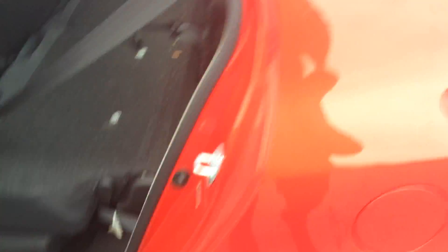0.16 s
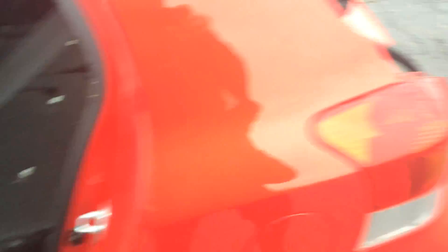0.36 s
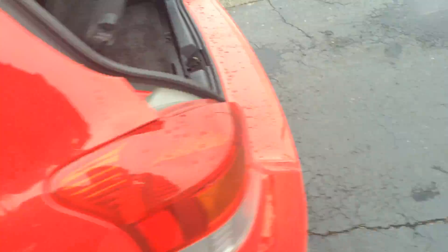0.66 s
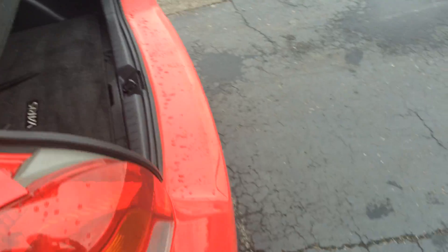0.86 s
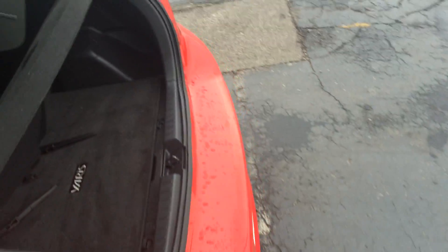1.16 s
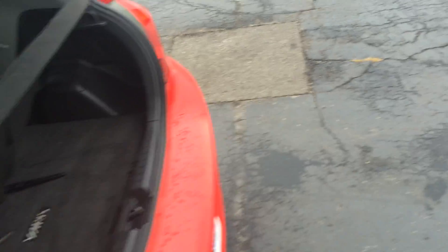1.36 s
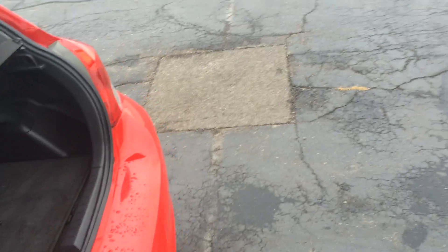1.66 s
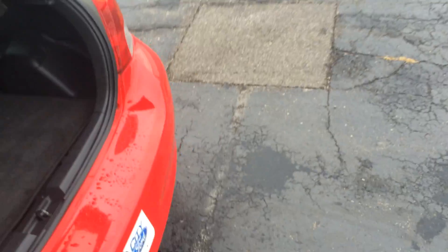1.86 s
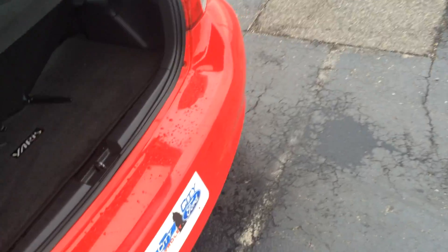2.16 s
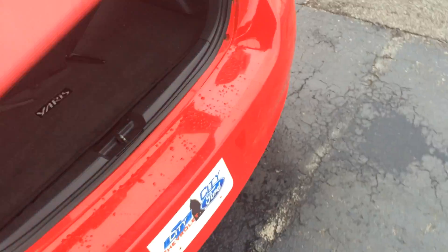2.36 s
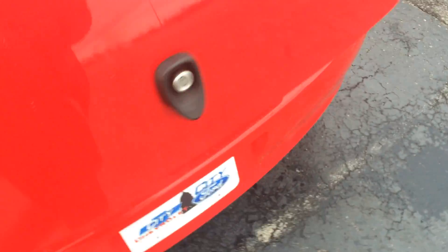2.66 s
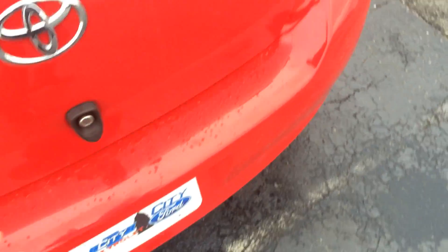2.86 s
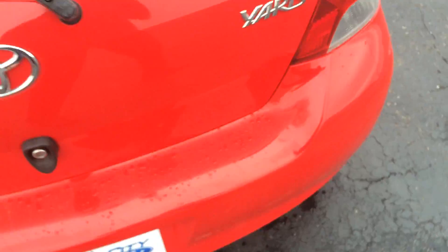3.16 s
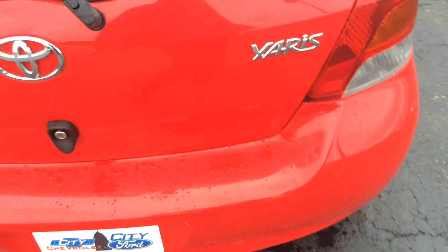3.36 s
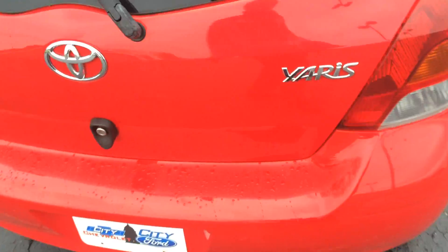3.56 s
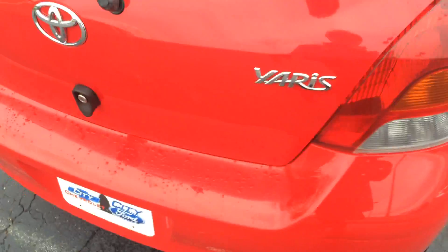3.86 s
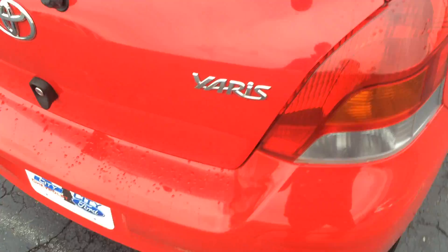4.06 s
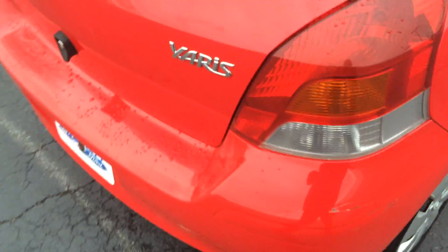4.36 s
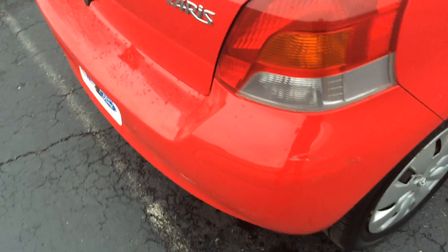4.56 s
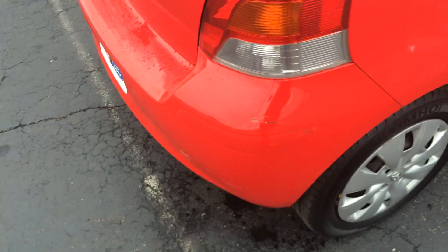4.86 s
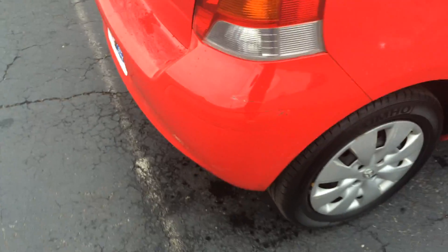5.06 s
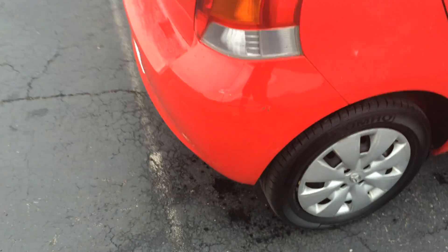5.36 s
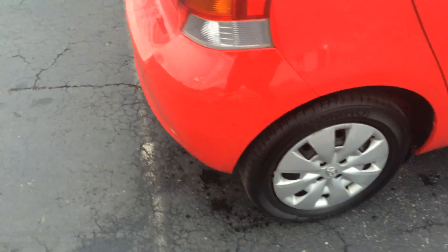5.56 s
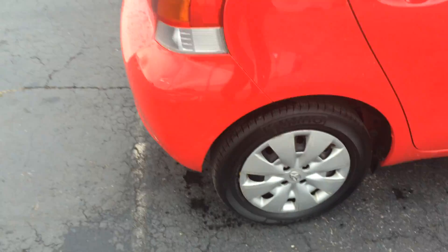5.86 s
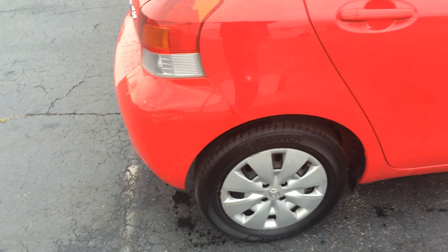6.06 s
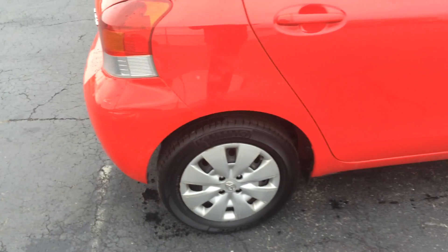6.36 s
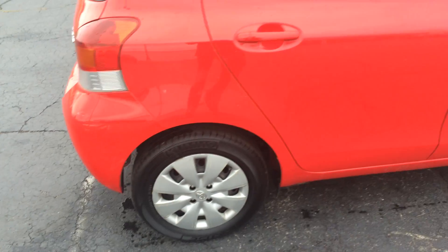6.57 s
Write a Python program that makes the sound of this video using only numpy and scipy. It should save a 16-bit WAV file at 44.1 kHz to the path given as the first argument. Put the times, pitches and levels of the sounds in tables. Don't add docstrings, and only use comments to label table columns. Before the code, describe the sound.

Wind buffets a bare phone microphone over a small car's uneven idle; a side door slams, then the heavier tailgate bangs shut.

```python
import sys
import numpy as np
from scipy import signal
from scipy.fft import rfft, irfft, next_fast_len
from scipy.io import wavfile
from scipy.ndimage import uniform_filter1d

SR = 44100
rng = np.random.default_rng(int(sys.argv[2]) if len(sys.argv) > 2 else 0)


def invert_db(level):
    return 10 ** (np.asarray(level, dtype=float) / 20)


def inscribe(sig):
    pcm = np.round(np.clip(np.atleast_2d(sig).T, -1, 1) * 32767)
    wavfile.write(sys.argv[1], SR, pcm.astype(np.int16))


N = 296793
T = np.arange(N) / SR


def noise():
    return rng.standard_normal(N)


def unit(x):
    return x / np.sqrt(np.mean(x ** 2))


def dull(x, hz):
    return signal.sosfilt(signal.butter(4, hz, fs=SR, output="sos"), x)


def decay(t, t60):
    return np.exp(-np.log(1000) * t / t60)


def curves(table):
    s, *columns = np.transpose(table)
    return [np.interp(T, s, c) for c in columns]


def colour(points):
    hz, db = np.transpose(points)
    size = next_fast_len(N)
    f = np.maximum(np.arange(size // 2 + 1) * SR / size, 1)
    gain = invert_db(np.interp(np.log(f), np.log(hz), db, -90, -90))
    return unit(irfft(rfft(noise(), size) * gain, size)[:N])


def ring(x, peaks):
    power = sum(invert_db(2 * db) * np.pi * width / SR for hz, width, db in peaks)
    out = 0
    for k, (hz, width, db) in enumerate(peaks):
        b, a = signal.iirpeak(hz, hz / width, SR)
        out = out + (-1) ** k * invert_db(db) * signal.lfilter(b, a, x)
    return out / np.sqrt(power)


def walk(rate):
    k = int(SR / rate)
    held = np.repeat(rng.standard_normal(N // k + 1), k)
    return 1.09 * uniform_filter1d(uniform_filter1d(held, k), k)[:N]


def strikes(s, db, t60, rise_s):
    power = np.zeros(N)
    for at, gain, ring_s in zip(s, invert_db(db), np.clip(t60, .005, 1)):
        i = slice(int(at * SR) + 1, int((at + 2 * ring_s) * SR))
        t = T[i] - at
        power[i] += (gain * decay(t, ring_s) * (1 - np.exp(-t / rise_s))) ** 2
    return np.sqrt(power)


def swings(rows, point):
    out = np.zeros(N)
    for (s, db, hz, ms), turn in zip(rows, rng.random(len(rows))):
        i = slice(max(int((s - .06) * SR), 0), int((s + .06) * SR))
        t = T[i] - s
        bell = np.exp(-np.log(2) * np.abs(2000 * t / ms) ** point)
        out[i] += invert_db(db) * bell * np.cos(2 * np.pi * (hz * t + turn))
    return out


def scattered(gap_s, wind_db, db, growth, scatter_db):
    s = np.arange(0, T[-1] - gap_s, gap_s)
    late, size, spare = rng.standard_normal((len(s), 3)).T
    s = s + gap_s * np.minimum(np.abs(late) / 2, 1)
    light_wind_db = -40
    gust_db = growth * (wind_db[(s * SR).astype(int)] - light_wind_db)
    return s, db + gust_db + scatter_db * np.clip(size, -3, 1.5), spare


# start_s, level_db
WIND_LEVEL = [(0, -39), (.44, -33), (.52, -27.5), (.71, -31.5), (.95, -47), (1.25, -44), (2.3, -45.5),
              (4.3, -43.5), (4.42, -32.5), (4.66, -39), (4.76, -25.5), (4.92, -49), (5.1, -45), (5.28, -31),
              (5.5, -43), (6.1, -38), (6.54, -49), (6.73, -45)]
# peak_s, level_db, pitch_hz, length_ms
GUST_POPS = [(.371, -24.5, 135, 2.8), (.401, -13.5, 149, 7.6), (.477, -19.5, 98, 48),
             (.491, -17, 109, 11.4), (.527, -11, 100, 7.9), (.571, -22, 145, 2.5), (.585, -15.5, 138, 6.9),
             (.62, -38, 107, 8.1), (.653, -14, 149, 8.7), (.69, -26, 149, 2.1), (4.415, -21, 126, 11),
             (4.428, -16, 89, 20), (4.443, -11, 105, 9.5), (4.47, -16.5, 171, 5.3),
             (4.498, -13.5, 136, 4.8), (4.59, -21.5, 170, 3.2), (4.629, -17.5, 103.5, 12.4),
             (4.689, -20, 128, 9.2), (4.754, -21, 190, 2.9), (4.767, -15.5, 119, 15),
             (4.791, -12.5, 99, 12.5), (4.807, -12, 110, 5.3), (4.83, -20.5, 105, 38),
             (5.141, -11.5, 95, 5.1), (5.173, -14, 113, 3.9), (5.191, -16.5, 115, 16),
             (5.217, -13.5, 125, 6.9), (5.291, -14.5, 117, 7.4), (5.309, -15.5, 119, 6.6),
             (5.344, -23, 152, 14)]
# peak_s, level_db, length_ms
MORE_PUFFS = [(.014, -24, 6.3), (.056, -30, 9.7), (.095, -23, 16), (.159, -17, 7.8), (.235, -22.5, 8.5),
              (.755, -20.5, 5.1), (.899, -22, 9), (1.114, -25.5, 8.2), (1.271, -27, 5.8), (1.422, -22, 7.9),
              (1.573, -30, 23), (2.31, -24.5, 14), (2.436, -25.5, 4.1), (2.967, -33, 5.4), (3.773, -31, 24),
              (4.392, -29, 5.2), (4.537, -31, 7.2), (4.737, -22, 9), (4.865, -28, 7), (4.884, -20.5, 7.4),
              (5.407, -28, 6.2), (5.567, -17.5, 13.4), (5.591, -20, 5.3), (5.679, -20, 6), (5.712, -22, 13),
              (5.798, -26.5, 7.2), (5.904, -21.5, 7.3), (6.011, -15.5, 14), (6.028, -29, 16),
              (6.178, -23.5, 7.2), (6.409, -21.5, 5.9), (6.453, -27.5, 21), (6.478, -19.5, 3.9),
              (6.492, -22, 8), (.296, -35, 6.7), (.328, -28, 7.6), (.456, -34, 9.1), (1.184, -36, 11),
              (1.231, -30.5, 13), (1.298, -30, 6.3), (1.36, -33.5, 11), (1.712, -28.5, 9.8),
              (1.916, -33.5, 5.6), (2.098, -33, 8.8), (2.342, -34, 14), (2.91, -34, 13),
              (3.544, -27.5, 10.5), (3.616, -33.5, 10), (3.69, -29.5, 12), (4.057, -33.5, 11),
              (4.356, -42, 7.5), (4.923, -32, 14), (5.101, -41, 15), (5.229, -23.5, 10), (5.264, -37, 4.5),
              (5.325, -21, 7.2), (5.451, -33.5, 5.1), (5.507, -43, 16), (5.94, -34, 8.6), (6.081, -29, 6.9),
              (6.144, -28.5, 5), (6.215, -25.5, 7.8)]
# peak_s, level_db, pitch_hz
EDDY_EDGES = [(0.017, -33.5, 420), (0.399, -28.5, 372), (0.479, -23, 365), (0.556, -26.5, 370),
              (.574, -24.5, 390), (.654, -27, 433), (.692, -25, 426), (0.773, -23, 562), (2.078, -31, 343),
              (4.44, -32, 473), (4.489, -22, 350), (4.499, -14.5, 385), (4.517, -28.5, 392),
              (4.594, -28, 385), (4.607, -28, 400), (4.686, -23.5, 358), (4.768, -15, 455),
              (4.783, -15, 340), (4.807, -15, 457), (4.829, -21.5, 362), (4.844, -24, 360),
              (5.141, -21.5, 393), (5.202, -25.5, 340), (5.305, -23, 350), (5.406, -31.5, 526),
              (5.585, -28, 420), (6.223, -30, 530), (6.405, -24, 398), (6.475, -26, 410), (6.496, -26, 337),
              (0.162, -35, 340), (0.37, -29.5, 332), (0.52, -28, 340), (0.539, -27, 334), (.62, -30, 300),
              (0.918, -36, 345), (1.29, -32, 343), (2.486, -31, 330), (3.952, -37, 310), (4.102, -40, 290),
              (4.25, -35.5, 300), (4.453, -25, 327), (4.736, -29, 360), (4.756, -24, 345),
              (5.064, -40, 303), (5.19, -26, 320), (5.219, -28.5, 383), (5.263, -33, 320),
              (5.293, -24.5, 340), (5.349, -28, 315), (5.619, -30, 298), (5.631, -36, 380),
              (5.939, -33, 340), (6.147, -47, 297)]


def wind():
    wind_db = curves(WIND_LEVEL)[0]
    edge_cycles, snap_cycles = 0.8, 1.03
    edges = swings([(s, db, hz, 1000 * edge_cycles / hz) for s, db, hz in EDDY_EDGES], 1.1)
    s, db, pitch = scattered(.009, wind_db, db=-53.5, growth=0.67, scatter_db=1)
    hz = 340 * np.exp(.15 * pitch)
    edges = edges + swings(list(zip(s, db, hz, 1000 * snap_cycles / hz)), 3.1)
    s, db, span = scattered(.024, wind_db, db=-39, growth=0.89, scatter_db=5)
    puffs = MORE_PUFFS + list(zip(s, db, 6.5 * np.exp(0.14 * span)))
    puff_swings = [(s, db, 104.8 * (10 / ms) ** 0.66, ms) for s, db, ms in puffs]
    pops = swings(GUST_POPS + puff_swings, 3.3)
    flutter_db = 1.8 * walk(45)
    rumble = colour([(20, -15), (55, 12.5), (100, 10.0), (170, -1.5), (260, -10.5), (400, -19.0)])
    bed = rumble * invert_db(wind_db - 0.53 + flutter_db)
    force = uniform_filter1d(np.abs(pops + bed), 500) / 0.13
    fine = colour([(150, -10.0), (260, 14.0), (400, -7.0), (600, -9.5), (850, -30), (1200, -37.0)])
    rustle = fine * force ** 1.44 * invert_db(-34.5 + 4.7 * walk(90))
    return pops + dull(edges, 1280) + bed + rustle


# start_s, thud_db, tailpipe_db, tick_db
IDLE_WALK = [(0, -45, -64, -70), (1.4, -53, -62, -80), (1.9, -57, -60.5, -68.5), (2.9, -41.5, -57.5, -77),
             (3.3, -50, -66, -79), (3.4, -46, -59, -70), (4.3, -47.5, -60, -73), (5.0, -54, -60.5, -66),
             (5.4, -66, -60, -61.5), (6.73, -52, -61.5, -58.5)]
# pitch_hz, width_hz, level_db
EXHAUST_MODES = [(105, 31, 2), (205, 17, 4.5), (290, 35, -10.5), (385, 11, -7.5)]
TAILPIPE_MODES = [(743, 130, 12), (977, 89, 11.5)]
VALVE_MODES = [(3130, 550, 7), (3720, 410, 7.5), (4340, 810, -1)]
BAY_MODES = [(1470, 260, 0)]


def engine():
    thud_db, pipe_db, tick_db = curves(IDLE_WALK)
    turn = T * 13.542
    firing = np.floor(2 * turn + 0.1215).astype(int)
    scatter_db = 3.5 * np.clip(rng.standard_normal(firing[-1] + 1), -2, 1.2)
    size = invert_db(scatter_db)[firing]
    pulses = size * (np.diff(firing, prepend=0) > 0)
    thud = unit(dull(ring(pulses, EXHAUST_MODES), 980)) + 0.24 * ring(noise(), EXHAUST_MODES)
    puff = size * np.exp(-((2 * turn + 0.087) % 1) / 0.26)
    pipe = unit(ring(ring((0.66 + puff) * noise(), TAILPIPE_MODES), TAILPIPE_MODES))
    from_tick = (turn - .72 + .5) % 1 - .5
    tick = 0.62 + np.exp(-(from_tick / 0.15) ** 2)
    valves = unit(ring(ring(tick * noise(), VALVE_MODES), VALVE_MODES))
    bay = unit(ring(ring(noise(), BAY_MODES), BAY_MODES))
    return invert_db(tick_db - 6.0) * bay + invert_db(thud_db) * thud + invert_db(pipe_db) * pipe + invert_db(tick_db) * valves


# start_s, level_db
ROAD_VIEW = [(0, -63), (.24, -63.5), (.5, -59), (.73, -64), (1.31, -60.5), (1.74, -65.5), (2.81, -61.5),
             (3.39, -60), (3.86, -59.5), (4.23, -61), (4.82, -62), (5.25, -58.5), (6.73, -57.5)]
# pitch_hz, level_db (per Hz)
ROAR_SPECTRUM = [(150, 0), (250, -8.5), (501, -9.5), (646, -10), (754, -21), (1090, -9.5), (1500, -11.5),
                 (1800, -13), (3500, -20), (4550, -33), (7700, -120)]
HISS_SPECTRUM = [(1470, -3), (2500, -15.5), (3300, -3), (4200, 0), (4930, -2), (13000, -14), (14700, -14),
                 (15500, -21)]
# start_s, end_s, level_db
GAIN_DUCKS = [
    (0.87, 1.134, -4),
    (3.06, 3.356, -5),
]


def traffic():
    hiss_db = curves(ROAD_VIEW)[0]
    roar_db = -53.5 + 0.49 * (hiss_db - hiss_db.mean())
    duck_db = sum(np.interp(T, [a, a + 0.03, b - .04, b + 0.016], [0, db, db, 0]) for a, b, db in GAIN_DUCKS)
    flicker_db = .5 * walk(20)
    roar = colour(ROAR_SPECTRUM) * invert_db(roar_db - 1.78 + flicker_db)
    hiss = colour(HISS_SPECTRUM) * invert_db(hiss_db + flicker_db)
    return (roar + hiss) * invert_db(duck_db)


# start_s, end_s, pitch_hz, level_db
SOLE_SCUFFS = [(0.408, .56, 1910, -60), (2.775, 2.87, 715, -53), (4.663, 4.744, 2580, -61.5),
               (1.66, 1.706, 560, -57), (1.744, 1.827, 514, -55.5), (1.847, 1.898, 560, -56),
               (2.426, 2.52, 620, -58.5), (4.307, 4.408, 670, -56.5)]


def scuffs():
    grit = invert_db(3.5 * walk(60)) * noise()
    out = np.zeros(N)
    for a, b, hz, db in SOLE_SCUFFS:
        swell = np.interp(T, [a, a + 0.02, b - .015, b], [0, 1, 1, 0])
        out += invert_db(db) * swell * ring(grit, [(hz, 0.32 * hz, 0)])
    return out


# peak_s, level_db, pitch_hz
WIND_RIPPLES = [(0.485, -34, 540), (.494, -37, 480), (.545, -29, 517), (.585, -34, 583), (1.916, -40, 360),
                (4.437, -31, 560), (4.47, -36, 560), (4.527, -37, 520), (4.545, -45, 450),
                (4.624, -36, 560), (4.635, -41, 480), (4.697, -33, 450), (4.762, -33, 554),
                (4.776, -33, 710), (4.792, -41, 640), (4.798, -39, 800), (4.815, -35, 700),
                (4.835, -32, 520), (5.149, -32.5, 503), (5.167, -33, 420), (5.299, -32, 474),
                (5.315, -36, 420), (5.446, -44, 453), (5.565, -38, 560), (5.6, -43, 400),
                (6.485, -31.5, 500)]


def ripples():
    cycles = 1.29
    return swings([(s, db, hz, 1000 * cycles / hz) for s, db, hz in WIND_RIPPLES], 0.93)


# start_s, knock_db, knock_hz, tick_db, t60_s
STEP_CLICKS = [(1.217, -36, 560, -52, 0.069), (1.222, -46, 700, -49, 0.027), (1.619, -33.5, 776, -57, 0.18),
               (1.636, -36.5, 323, -71, 0.1), (1.625, -46.5, 1500, -58, 0.05), (1.647, -42, 730, -68, 0.22),
               (0.615, -51, 1790, -51.5, 0.047), (.632, -63, 1800, -57, 0.022),
               (1.288, -49.5, 1590, -58, .08), (4.024, -47, 800, -57, 0.027), (4.437, -45, 620, -66, 0.028),
               (1.858, -50, 1500, -52, 0.0092), (2.015, -31.5, 1350, -39.5, 0.018),
               (2.0185, -45, 2700, -41.5, 0.019), (2.023, -46, 2200, -52, 0.022),
               (2.418, -32, 310, -74, 0.22), (2.455, -37, 257, -74, 0.06), (2.772, -38.5, 960, -57, 0.2),
               (2.778, -50, 2380, -65, 0.05), (2.83, -56, 755, -67, 0.09), (2.805, -61, 3500, -40.5, 0.031),
               (2.808, -38.5, 790, -64, 0.15), (2.861, -78, 3020, -59, .015),
               (3.248, -45.5, 1010, -57, 0.021), (3.828, -40.5, 447, -50, 0.04),
               (4.52, -79, 2000, -54.5, 0.22), (5.066, -48, 1770, -56.5, 0.43),
               (5.56, -63, 2000, -53, 0.041), (6.253, -50, 1900, -48.5, 0.03)]


def clicks():
    s, knock_db, hz, tick_db, t60 = np.transpose(STEP_CLICKS)
    bright = colour([(2000, 9.5), (3000, 0.5), (8000, -6.0), (15500, -15.5)])
    out = strikes(s, tick_db - 0.5, 2.0 * t60, 0.00037) * bright
    for k in range(len(s)):
        one = slice(k, k + 1)
        push = strikes(s[one], knock_db[one] + 3.0, t60[one], 0.41 * t60[k] ** 2) * noise()
        push[int(s[k] * SR)] += invert_db(knock_db[k] + 21.0 - 200 * t60[k])
        near = slice(int(s[k] * SR), int((s[k] + .5) * SR))
        knock = ring(push[near], [(hz[k], min(0.5 * hz[k], 420.), 0)])
        out[near] += dull(knock, 1.22 * hz[k])
    return out


# pitch_hz, level_db (per Hz)
CRACK_SPECTRUM = [(1900, -18), (2500, 0.5), (3500, -6.5), (4500, -5), (6000, -12), (14300, -20.5),
                  (15600, -20)]


def slam(blows, thud, clank, boom, snap, first_hz, rest_hz, sag_s, top_hz):
    s, swing_db, clank_db, crack_db, t60 = np.transpose(blows)
    at = (s * SR).astype(int)
    hz = rest_hz + (first_hz - rest_hz) * np.exp(-(s - s[0]) / sag_s)
    near = slice(int(s[0] * SR), int((s[-1] + .5) * SR))
    t = np.maximum(T[near] - s[:, None], 0)
    fade = decay(t, 0.28 * t60[:, None])
    swing = invert_db(swing_db)[:, None] * fade * np.sin(2 * np.pi * hz[:, None] * t)
    swing = rng.choice([-1, 1], len(s)) @ swing
    swing = dull(np.pad(swing, (near.start, N - near.stop)), 820)
    shove = strikes(s, swing_db - 8.5, boom * t60, 0.0038) * noise()
    shove[at] += invert_db(swing_db + 15.0)
    panel = dull(ring(shove, thud), 650)
    grit = invert_db(2.0 * walk(400))
    crack = grit * strikes(s, crack_db, snap * t60, 0.0022) * dull(colour(CRACK_SPECTRUM), top_hz)
    out = swing + panel + crack
    soft = (clank_db - 7.0, clank[:3], .95)
    hard = ((clank_db + crack_db) / 2, clank[3:], .7)
    for db, modes, hold in (soft, hard):
        push = grit * strikes(s, db, hold * t60, 0.0008) * noise()
        push[at] += invert_db(db + 14.5)
        out += dull(ring(push, modes), 4650)
    return out


# start_s, swing_db, clank_db, crack_db, t60_s
DOOR_BLOWS = [(.785, -18, -8, -40, 0.06), (.791, -23, -24, -48, 0.14), (.8005, -25, -24, -28, .02),
              (.8035, -7.5, -5, -23, 0.033), (.8055, -5, -17, -33, 0.048), (.812, -13.5, -18, -36, 0.19),
              (.826, -1, -32, -44, 0.027), (.832, -7.5, -46, -28.5, 0.067), (.845, -41, -37, -50, 0.046),
              (.853, -16, -48, -37, 0.047), (.862, -33, -32, -44, .06), (.817, -31, -28, -35, 0.085),
              (.838, -13.5, -38, -51, 0.042)]
# pitch_hz, width_hz, level_db
DOOR_SKIN = [(76, 39, -2), (170, 20, 5.5), (281, 46, 1), (345, 48, -0.5), (420, 110, -5.5)]
DOOR_METAL = [(600, 430, -2), (786, 166, 8), (964, 440, -3.5), (1270, 300, -1.5), (1790, 180, 7.5),
              (2300, 270, -3.5), (2960, 340, -8), (4140, 200, -11), (4700, 180, -18)]


def side_door():
    return slam(DOOR_BLOWS, DOOR_SKIN, DOOR_METAL, boom=2.1, snap=0.6,
                first_hz=420, rest_hz=210, sag_s=0.049, top_hz=11600)


# start_s,
# level_db, pitch_hz, t60_s
PART_PINGS = [(.785, -20, 790, 0.054), (0.785, -39, 4230, .03), (.787, -31, 2290, .04),
              (.801, -36, 4830, 0.027), (.8035, -17, 700, .04), (2.9974, -15.5, 560, 0.046),
              (3.0003, -4.5, 198.4, 0.073), (3.0002, -21.5, 75.4, .25), (3.0138, -19.5, 1170, 0.042),
              (3.0144, -18, 2200, 0.027), (2.798, -39, 1770, .09), (2.802, -45, 2290, .07)]


def pings():
    out = np.zeros(N)
    for s, db, hz, t60 in PART_PINGS:
        i = slice(int(s * SR) + 1, int((s + .4) * SR))
        t = T[i] - s
        out[i] += invert_db(db) * decay(t, t60) * np.sin(2 * np.pi * hz * t)
    return out


def cabin(x):
    t = T[:SR // 4]
    echoes = rng.standard_normal(len(t)) * decay(t, .16) * (t > .002)
    echoes = echoes / np.sqrt(np.sum(echoes ** 2))
    bright = signal.sosfilt(signal.butter(2, 420, "high", fs=SR, output="sos"), x)
    return x + invert_db(-11.5) * signal.fftconvolve(bright, echoes)[:N]


def rubbing(hz):
    waver_hz, grip_db = 60 * walk(200), 5 * walk(70)
    return invert_db(grip_db) * np.sin(2 * np.pi * np.cumsum(hz + waver_hz) / SR)


# start_s, end_s, pitch_hz, level_db
STRUT_SQUEAKS = [
    (1.223, 1.262, 3260, -61),
    (1.267, 1.315, 3220, -60),
    (4.344, 4.387, 2560, -60),
    (4.38, 4.437, 2770, -61),
]


def squeaks():
    out = np.zeros(N)
    for a, b, hz, db in STRUT_SQUEAKS:
        out += invert_db(db) * np.interp(T, [a, a + .005, b - .005, b], [0, 1, 1, 0]) * rubbing(hz)
    return out


# pitch_hz, width_hz, level_db
STRIKER_PLATE = [(930, 75, -12), (1410, 70, -5.5), (1770, 65, 0), (2290, 62, -6), (2850, 120, -24)]
# start_s, level_db, t60_s
CATCH_TOUCHES = [
    (2.78, -56, .03),
    (2.796, -30.5, 0.054),
    (2.803, -41, .04),
    (2.816, -50, .05),
]


def latch():
    s, db, t60 = np.transpose(CATCH_TOUCHES)
    return ring(strikes(s, db, t60, .001) * noise(), STRIKER_PLATE)


# start_s, swing_db, clank_db, crack_db, t60_s
GATE_BLOWS = [(2.9972, -8, -11.5, -48, 0.034), (3.0005, -12, -22, -49, 0.15),
              (3.0055, -15, -28, -37, 0.076), (3.0141, -1, -3.5, -16, 0.019),
              (3.018, -15, -22, -27.5, 0.052), (3.035, -11.5, -35, -32, 0.1),
              (3.046, -7, -12.5, -46, 0.087), (3.026, -8.5, -19, -46, 0.14), (3.053, -21, -29, -36, 0.026),
              (3.062, -23, -26, -58, 0.08), (3.074, -9.5, -31, -53, 0.036),
              (3.087, -15.5, -31.5, -58, 0.14), (3.097, -21, -29, -54, 0.063),
              (3.111, -17.5, -47, -60, 0.1), (3.128, -19.5, -48, -65, .09), (3.142, -36, -44, -65, 0.058)]
# pitch_hz, width_hz, level_db
GATE_SKIN = [(77, 81, -3.5), (138, 51, -2), (199, 22, -1), (306, 39, -6.5), (372, 150, -16)]
GATE_METAL = [(520, 95, 6), (700, 52, 9), (900, 140, 5.5), (1170, 30, -5), (1410, 300, -6), (1840, 300, -4),
              (2200, 160, -6), (2800, 140, -32), (3820, 180, -19), (4250, 200, -22.5)]


def tailgate():
    return slam(GATE_BLOWS, GATE_SKIN, GATE_METAL, boom=1.3, snap=0.92,
                first_hz=420, rest_hz=193, sag_s=0.002, top_hz=16000)


def scene():
    slams = cabin(side_door() + tailgate())
    air = wind() + ripples() + traffic()
    car = engine() + squeaks() + latch() + pings()
    feet = clicks() + scuffs()
    return (air + car + feet + slams)[None]


def low_pass(x):
    return signal.sosfilt(signal.butter(12, 15350, fs=SR, output="sos"), x)


def record(dry):
    x = signal.sosfilt(signal.butter(2, 35, "high", fs=SR, output="sos"), dry)
    top = 2.0
    return low_pass(top * np.tanh(x / top))


dry = scene()
out = record(dry)
inscribe(out)
```